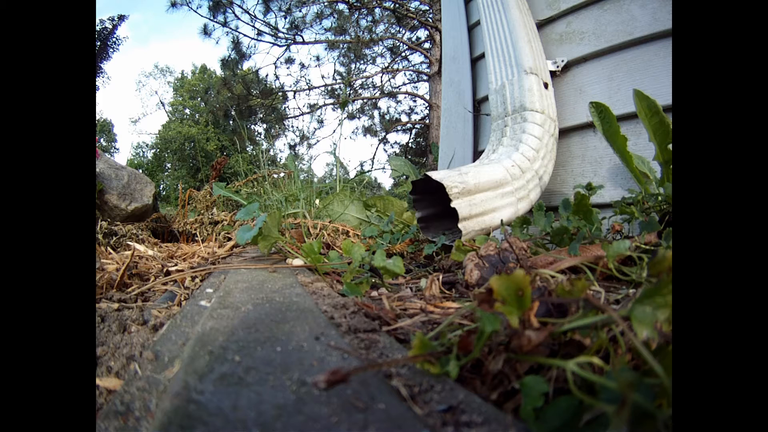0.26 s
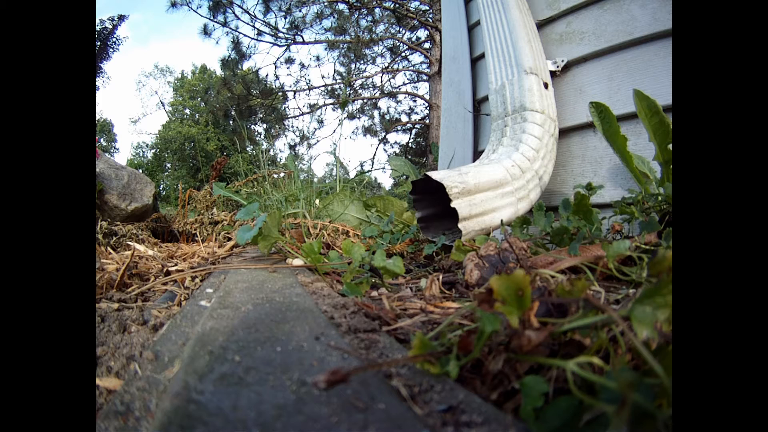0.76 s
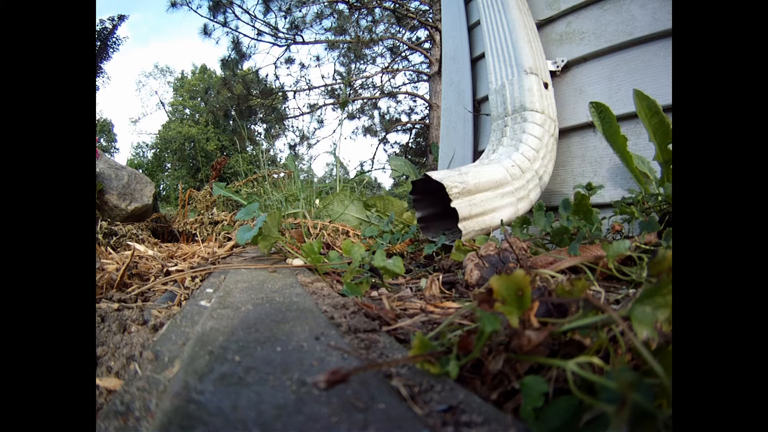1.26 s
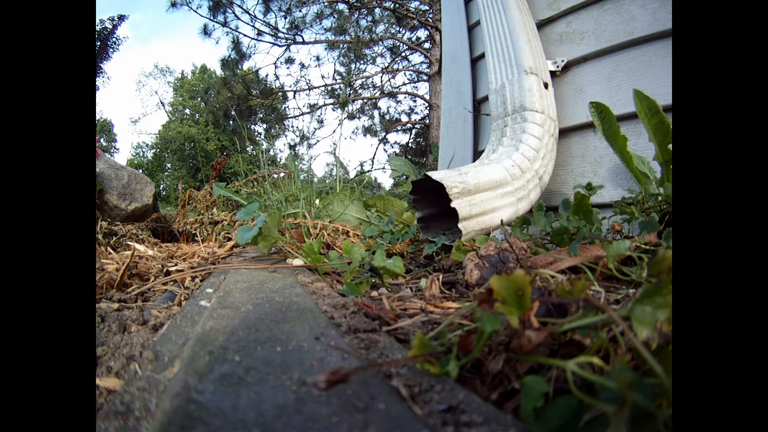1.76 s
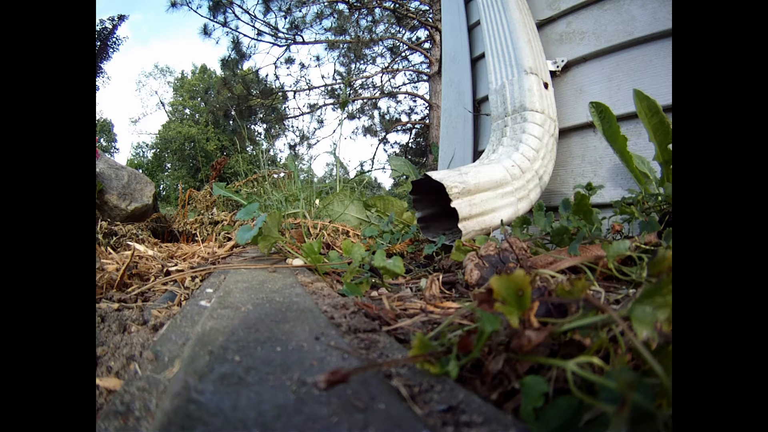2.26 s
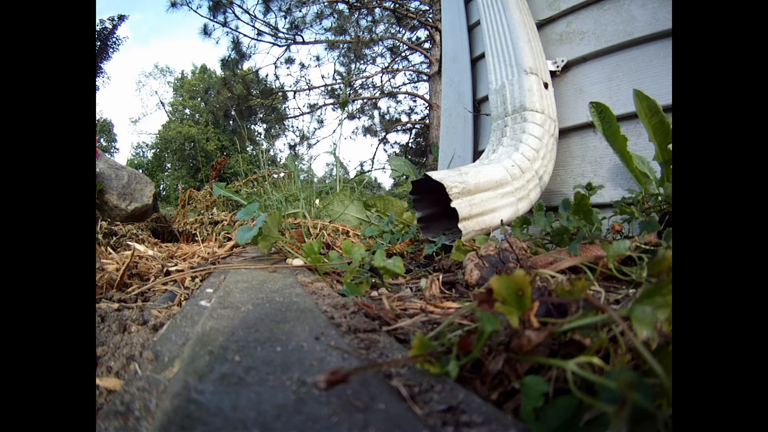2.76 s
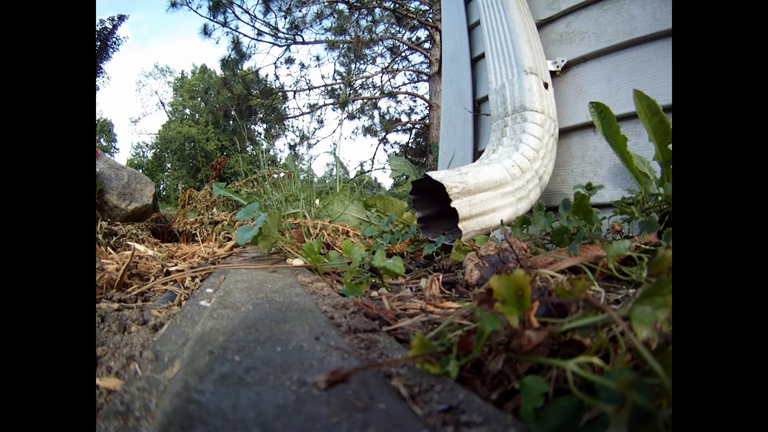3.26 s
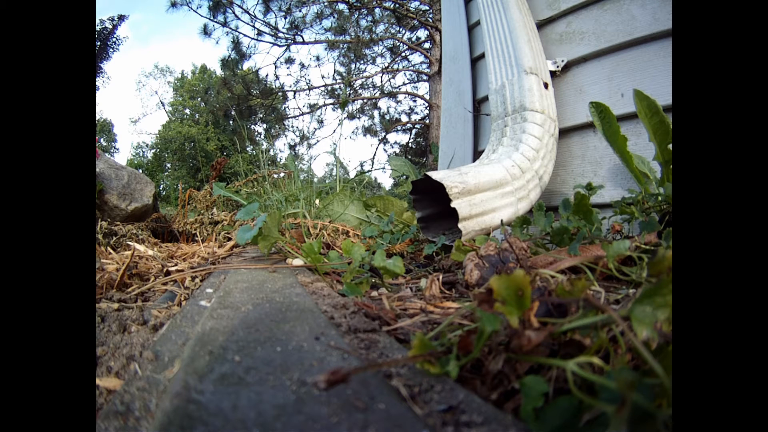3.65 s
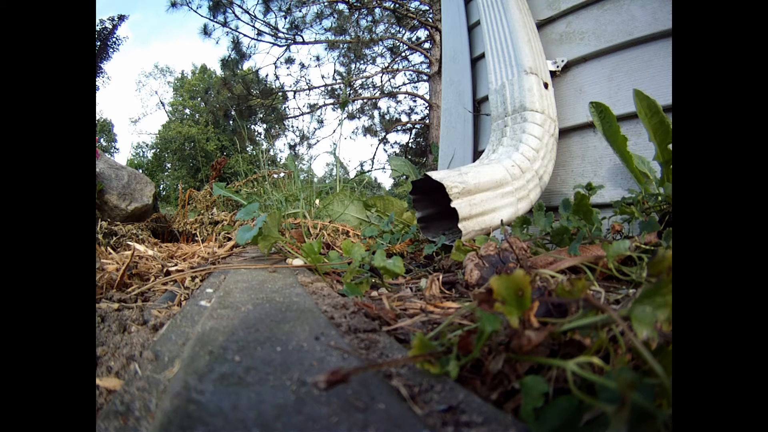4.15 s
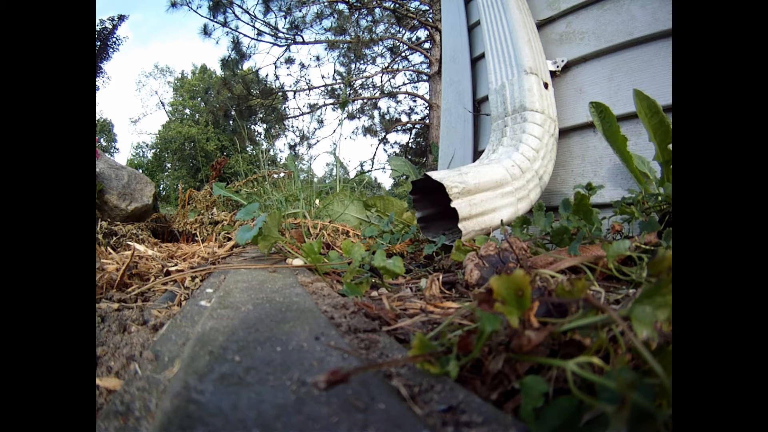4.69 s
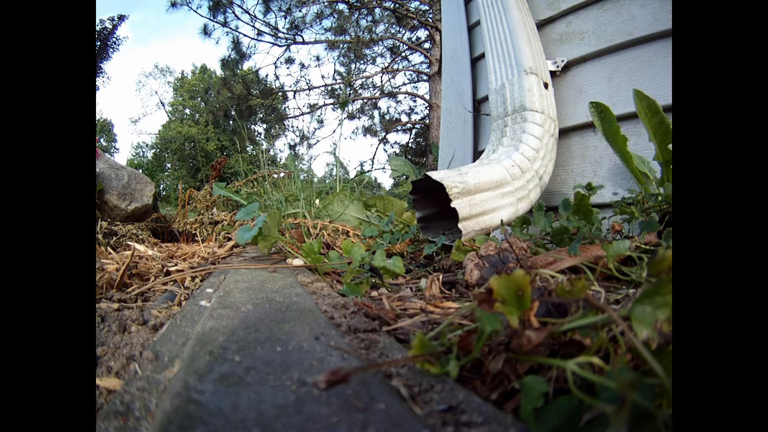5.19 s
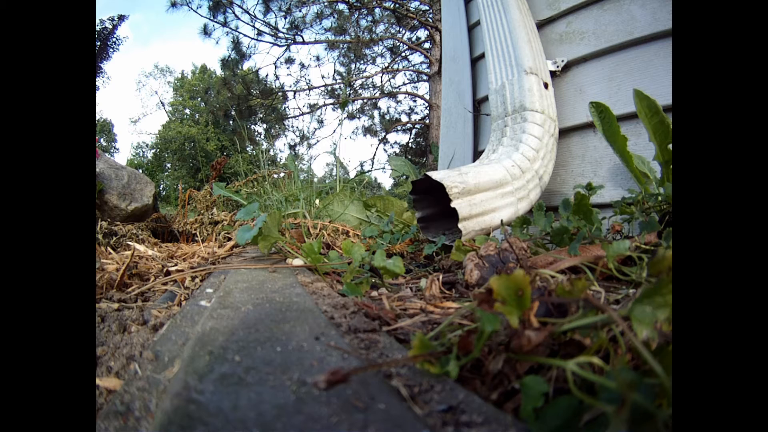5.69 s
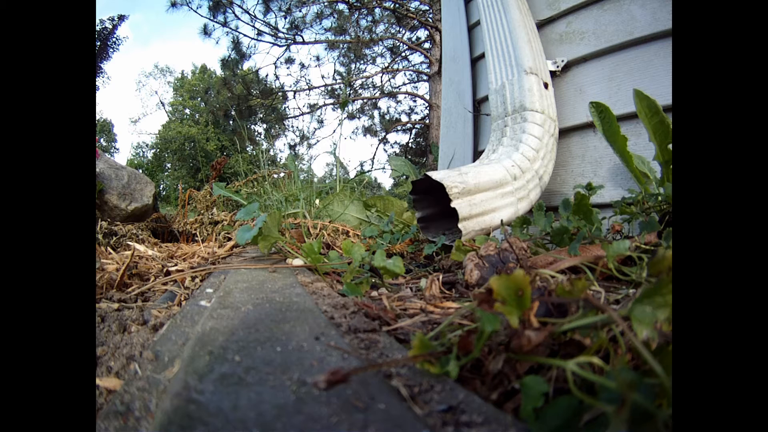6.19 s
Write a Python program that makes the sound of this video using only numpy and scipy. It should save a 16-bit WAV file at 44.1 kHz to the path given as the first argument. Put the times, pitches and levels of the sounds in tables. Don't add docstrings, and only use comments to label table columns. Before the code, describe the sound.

Claws scrabble faintly in a metal pipe, a piercing chip bursts out with a small rapid trill, then faint ticks over steady compressor hum.

```python
import sys
import numpy as np
from scipy import signal
from scipy.fft import rfft, irfft, next_fast_len
from scipy.io import wavfile
from scipy.ndimage import uniform_filter1d

SR = 44100
rng = np.random.default_rng(int(sys.argv[2]) if len(sys.argv) > 2 else 0)


def level_to_linear(level):
    exponent = np.asarray(level, float) / 20
    return 10 ** exponent


def dump(signal):
    limited = np.clip(np.atleast_2d(signal).T, -1, 1)
    pcm = np.round(limited * 32767).astype(np.int16)
    wavfile.write(sys.argv[1], SR, pcm)


N = 283563

# time_s, pitch_hz, level_db
CHIP_PATH = [
    (1.139, 7957, -34),
    (1.143, 7000, -15),
    (1.148, 6074, -8.5),
    (1.1538, 5050, -5.8),
    (1.1585, 4446, -9),
    (1.164, 3480, -19),
    (1.171, 2850, -26),
    (1.1755, 2830, -28),
    (1.179, 2650, -49),
]
# start_s, level_db, attack_s, hold_s, release_s
CHIP_BREATH = [
    (1.12, -33.5, 0.0029, .018, 0.0031),
    (1.142, -18.5, .008, 0.0067, .003),
    (1.154, -25, .004, .0005, .008),
]
# start_s, length_s, fall_hz, level_db, bend (above 1 holds the pitch first)
TRILL_NOTES = [
    (1.2075, .0115, 700, -29, .8),
    (1.2535, .0115, 800, -29, .9),
    (1.297, .014, 1000, -25.5, 1.5),
    (1.346, .016, 900, -24.5, 1.5),
    (1.393, .018, 1500, -26, 1.4),
    (1.443, .019, 1650, -27, 1.1),
    (1.492, .018, 1150, -28, 2.2),
    (1.541, .020, 1950, -29, 1.1),
]
# delay_s, level_db
PIPE_ECHOES = [(.0020, -10.5), (0.0123, -19), (0.0144, -20.5), (0.0192, -23), (.0285, -23), (0.031, -27.5)]
# pitch_hz, level_db, t60_s
PIPE_AIR = [(2830, -46.5, 0.12), (3310, -46.5, 0.092)]
# pitch_hz, level_db, t60_s
PIPE_LOW = [(947.5, -8, 0.074), (1160, -9, 0.011), (1387, -2.5, 0.027)]
# pitch_hz, level_db, t60_s
PIPE_WALL = [(2291, -0.5, 0.055), (1883, -9.5, 0.018)]
# pitch_hz, level_db, t60_s
PIPE_HIGH = [(3170, -25, 0.014), (3711, -7, 0.02), (4260, -9, 0.021), (4900, -3, .01), (5401, 6.5, 0.015)]
# start_s, peak_db
SCRAMBLE_TICKS = [(0.0044, -41), (0.0273, -47), (0.5067, -52.5), (0.7518, -54), (0.99, -45), (0.9969, -47),
                  (1.0893, -48.5), (1.114, -44), (1.2495, -36.5), (1.4376, -46.5), (1.4864, -44),
                  (1.5917, -55.5), (1.6793, -48), (1.7797, -60), (1.7998, -57.5), (1.908, -54),
                  (1.926, -56.5), (2.0262, -56), (2.0475, -56.5), (2.058, -47.5), (2.176, -60),
                  (2.257, -45.5), (2.267, -58), (2.2969, -45.5), (2.3037, -42.5), (2.3126, -43),
                  (2.3236, -51.5), (2.3581, -50), (2.5146, -56.5), (2.535, -44.5)]
# start_s, peak_db
CREEP_TICKS = [(2.7161, -55), (2.744, -52), (2.973, -58), (3.2138, -56.5), (3.3936, -60.5), (3.4916, -57),
               (3.503, -62.5), (3.528, -62), (3.688, -61.5), (3.8894, -63), (4.158, -64), (4.308, -54.5),
               (4.6435, -55.5), (5.2257, -56), (5.2622, -56), (5.9072, -57), (6.4078, -62.5)]
# start_s, wall_ring_db, low_knock_db
PAW_THUDS = [(0.168, -55, -53), (0.2778, -55, -56), (0.3347, -56.5, -49), (0.3584, -64, -59.5),
             (0.7391, -52, -60), (0.9671, -61.5, -50), (0.9794, -50.5, -52.5), (1.2495, -60, -38.5),
             (1.2595, -49.5, -43), (1.9788, -58, -65), (2.108, -43, -48), (2.12, -48, -51.5),
             (2.14, -50, -57), (2.257, -49.5, -41), (2.3236, -56.5, -49), (2.3335, -56, -54),
             (2.5141, -53, -69), (2.5192, -51.5, -57), (2.973, -54, -70)]
# start_s, level_db, attack_s, hold_s, release_s
SLIDES = [(0.001, -48.5, 0.0024, .04, .07), (0.14, -65, 0.058, 0.078, .2), (0.29, -64.5, 0.044, .02, 0.22),
          (.51, -62.5, .03, 0.014, 0.059), (.72, -66.5, .2, .08, .4), (1.002, -48.5, .06, .002, .045),
          (1.04, -55.5, 0.03, .002, 0.0704), (1.118, -47.5, 0.046, .002, .003),
          (1.19, -54.5, .003, .14, .7), (2.124, -60, .25, .1, .5), (2.53, -65.5, .04, .02, .06)]
# start_s, length_s, start_hz, end_hz, level_db
BIRD_NOTES = [
    (.862, .03, 3150, 3100, -65),
    (3.09, .18, 2900, 2050, -71),
    (3.595, .025, 4100, 4000, -71),
    (3.65, .3, 4800, 2550, -72),
    (3.89, .15, 2900, 1950, -67),
    (3.87, .025, 4100, 4000, -71),
    (4.1, .12, 2400, 2000, -73),
]
# start_s, level_db, attack_s, hold_s, release_s
BARK_SWELL = (6.19, -59.5, .045, .03, .15)
# multiple, level_db
BARK_PARTIALS = [(2, 4.5), (3, 9), (4, 1.5), (5, -12.5), (6, -6)]
# multiple, level_db
NEAR_LINES = [(1, -63.5), (2, -47.5), (3, -62), (4, -49.5), (5, -49.5), (6, -65), (7, -57), (8, -57),
              (10, -76), (11, -71.5)]
# multiple, level_db
FAR_LINES = [(1, -61.5), (2, -50.5), (3, -72.5), (4, -57)]
# time_s, level_db
HUM_SWELL = [(0.0, -53), (0.09, -49), (1.11, -48.5), (1.22, -58.5), (1.32, -46), (3.28, -45.5), (3.33, -44),
             (4.32, -50), (5.32, -43), (5.46, -54), (5.53, -42), (5.71, -50.5), (5.77, -46), (6.23, -55.5),
             (6.32, -45.5), (6.43, -56)]
# frequency_hz, level_db_per_hz
FLOOR_COLOUR = [(15, -94), (35, -74.5), (60, -64.5), (110, -71.5), (170, -75), (240, -81), (320, -87),
                (600, -95), (1200, -96.5), (2400, -100), (4000, -103), (5500, -103), (5900, -108),
                (9000, -110)]
# frequency_hz, gain_db
MIC_RESPONSE = [(2000, 0), (5000, 0.5), (5330, 0), (5450, -7.5), (5600, -3.5), (5850, -9), (7000, -14.5),
                (9000, -6.5)]


def rms_one(x):
    return x / np.sqrt(np.mean(x ** 2) + 1e-20)


def in_time(rows):
    t = np.arange(N) / SR
    s, *columns = np.transpose(rows)
    return [np.interp(t, s, c) for c in columns], (t > s[0]) & (t < s[-1])


def swell(rows):
    out = 0
    for s, db, attack, hold, release in rows:
        corners = s + np.cumsum([-attack, attack, hold, release])
        (shape,), on = in_time(np.transpose([corners, [-25, 0, 0, -25]]))
        out = out + on * level_to_linear(db + shape)
    return out


def shaped(x, gain):
    size = next_fast_len(N)
    hz = np.fft.rfftfreq(size, 1 / SR) + 0.00082
    return irfft(rfft(x, size) * gain(hz), size)[:N]


def colour(x, points):
    hz, db = np.transpose(points)
    return shaped(x, lambda f: level_to_linear(np.interp(np.log(f), np.log(hz), db)))


def drift(rate):
    r = np.exp(-80 * np.pi * rate / SR)
    slow = signal.lfilter([1], [1, -2 * r, r * r], rng.standard_normal(N // 40 + 2002))[2000:]
    return np.interp(np.arange(N) / 40, np.arange(len(slow)), rms_one(slow))


def ring(clicks, modes):
    out = 0
    for hz, db, t60 in modes:
        r, w = level_to_linear(-60 / (t60 * SR)), 2 * np.pi * hz / SR
        out = out + level_to_linear(db) * signal.lfilter([0, np.sin(w)], [1, -2 * r * np.cos(w), r * r], clicks + 1e-18)
    return out


def whistles(notes, edge):
    out = np.zeros(N)
    for s, length, start_hz, end_hz, db, bend in notes:
        u = np.linspace(0, 1, int(length * SR))
        phase = 2 * np.pi * np.cumsum(start_hz + (end_hz - start_hz) * u ** bend) / SR
        fade = np.clip(np.minimum(u, .5 * (1 - u)) / edge, 0, 1)
        out[int(s * SR):][:len(u)] += level_to_linear(db) * np.sin(phase) * fade
    return out


def dying_noise(t60, size):
    fade = level_to_linear(-60 * np.arange(size) / SR / t60)
    return rms_one(rng.standard_normal(size) * fade) / np.sqrt(size)


def chipmunk():
    (hz, db), on = in_time(CHIP_PATH)
    throb_s, throb_per_s, throb_db = 1.148, 190, 8.5
    beats = np.clip((np.arange(N) / SR - throb_s) * throb_per_s, 0, 3)
    loudness = np.sqrt(2) * level_to_linear(db - throb_db * np.sin(np.pi * beats) ** 2) * on
    phase = 2 * np.pi * np.cumsum(hz * on) / SR
    chip = loudness * (np.sin(phase) + level_to_linear(-18.5) * np.sin(2 * phase))

    breath = colour(rng.standard_normal(N),
                    [(300, -21.0), (600, -18.5), (850, 8.5), (1200, -13), (3000, -0.5), (4500, -1)])
    rasp = swell(CHIP_BREATH) * breath

    middle_hz = 4225
    trill = [(s, length, middle_hz + fall / 2, middle_hz - fall / 2, db, bend)
             for s, length, fall, db, bend in TRILL_NOTES]
    return pipe_and_yard(chip + whistles(trill, edge=.17)) + rasp


def pipe_and_yard(x):
    response = np.zeros(16000)
    response[0] = 1
    for delay, db in PIPE_ECHOES:
        response[round(delay * SR)] = level_to_linear(db)
    response[200:] += level_to_linear(-15) * dying_noise(t60=0.25, size=15800)
    return signal.fftconvolve(x, response)[:N] + ring(x, PIPE_AIR)


def contacts():
    tips = []
    for s, db in [*SCRAMBLE_TICKS, *CREEP_TICKS]:
        body_db = -5.5 - 0.66 * (db + 55)
        tips.append((s, db, body_db, body_db, 0.012))
    tick_db = -9
    paws = [(s, wall + tick_db, -tick_db, low - wall - tick_db, .011) for s, wall, low in PAW_THUDS]
    return tips + paws


def claws():
    high, wall, low = np.zeros((3, N))
    grain_size = level_to_linear(3.23 * np.minimum(rng.exponential(1, N), 4))
    grains = (rng.random(N) < 3000 / SR) * grain_size * rng.choice([-1, 1], N)
    for s, db, wall_db, low_db, length in contacts():
        at = int(s * SR)
        length = max(length, .001)
        u = np.arange(min(int(4 * length * SR), N - at)) / SR
        run = grains[at:at + len(u)] * np.exp(-u / length)
        run[0] = 6
        high[at:at + len(u)] += level_to_linear(db - 15) * run
        wall[at:at + len(u)] += level_to_linear(db + wall_db - 18.5) * run
        low[at:at + len(u)] += level_to_linear(db + low_db - 19.5) * run
    crackle = level_to_linear(11.0) * np.diff(high, prepend=0)
    thud = level_to_linear(7.0) * signal.lfilter([.3, 0, -.3], [1, -1.55, .58], wall + low)
    out = crackle + thud
    for clicks, modes in ((high, PIPE_HIGH), (wall, PIPE_WALL), (low, PIPE_LOW)):
        for mode in modes:
            out += ring(clicks * level_to_linear(1.1 * drift(25)), [mode])
    return out


def rustle():
    grain_size = level_to_linear(2.5 * rng.exponential(1, (2, N)))
    grains = (rng.random((2, N)) < 6000 / SR) * grain_size * rng.choice([-1, 1], (2, N))
    bright_band = signal.butter(2, [1800, 7000], "band", fs=SR, output="sos")
    dull_band = signal.butter(2, [500, 2200], "band", fs=SR, output="sos")
    bright = rms_one(signal.sosfilt(bright_band, grains[0]))
    dull = rms_one(signal.sosfilt(dull_band, grains[1]))
    return swell(SLIDES) * (bright + level_to_linear(-7) * dull) * level_to_linear(2 + 2.5 * drift(30))


def dog():
    bark_hz, flat_hz, settle_s = 424, 20, .02
    late = np.maximum(np.arange(N) / SR - BARK_SWELL[0], 0)
    hz = bark_hz - flat_hz * np.exp(-late / settle_s)
    phase = 2 * np.pi * np.cumsum(hz * (1 + .028 * drift(60))) / SR
    hoarse = 1 + .4 * drift(250)
    voice = sum(level_to_linear(db + 5.3 * drift(25)) * np.sin(k * phase) for k, db in BARK_PARTIALS)
    return swell([BARK_SWELL]) * hoarse * voice


def birds():
    song_s, gap_s = 4.31, .313
    song_note = (.125, 4600, 2950, -71.5, .5)   # length_s, start_hz, end_hz, level_db, bend
    notes = [(*row, .8) for row in BIRD_NOTES]
    notes += [(song_s + gap_s * k, *song_note) for k in range(6)]
    return whistles(notes, edge=.2) * level_to_linear(3 * drift(90))


def far_calls():
    bird, bark = birds(), dog()
    blur = dying_noise(t60=.55, size=14000)
    birds_heard = level_to_linear(-13) * bird + level_to_linear(6.5) * signal.fftconvolve(bird, blur)[:N]
    return birds_heard + bark + level_to_linear(-5) * signal.fftconvolve(bark, blur)[:N]


def compressor(shaft_hz, orders, wander, sway_db):
    (deep_db,), _ = in_time(HUM_SWELL)
    upper_db = 0.097 * deep_db - .5 * np.arange(N) / SR
    turn = 2 * np.pi * np.cumsum(shaft_hz * (1 + wander * drift(0.83))) / SR
    out = 0
    for k, db in orders:
        swell_db = deep_db if k * shaft_hz < 70 else upper_db
        gain = level_to_linear(db + swell_db - swell_db.mean() + sway_db * drift(1.2))
        out = out + np.sqrt(2) * gain * np.sin(k * turn + rng.uniform(0, 2 * np.pi))
    return out


def background_hiss():
    return colour(rng.standard_normal(N) * np.sqrt(SR / 2), FLOOR_COLOUR) * level_to_linear(.5 * drift(3))


def scene():
    near = compressor(25.67, NEAR_LINES, wander=.002, sway_db=1.82)
    far = compressor(55.6, FAR_LINES, wander=.012, sway_db=2.0)
    mono = chipmunk() + claws() + rustle() + far_calls() + near + far + background_hiss()
    return np.array([mono, mono])


def stereo_grain(x, db, power, empty_db):
    z = signal.stft(x, nperseg=2048)[2]
    level = np.exp(uniform_filter1d(np.log(np.abs(z) + 1e-9), size=13, axis=0))
    half_rate = slice(264, 294)
    kept = uniform_filter1d(np.abs(z[half_rate]).mean(axis=0), size=3) > level_to_linear(empty_db)
    z[half_rate] *= kept
    level[half_rate] *= kept

    frames = z.shape[1]
    runs = rms_one(uniform_filter1d(rng.standard_normal(frames), size=4))
    patches = rms_one(uniform_filter1d(rng.standard_normal((82, frames)), size=3))
    patches = np.repeat(patches, 13, axis=0)[:1025]
    loud = level[40:].mean(axis=0) > level_to_linear(-74)
    apart = (patches > -1.2) * np.where(loud, level_to_linear(7), 1)
    apart[:17] = (runs > 1.8) * level_to_linear(3) + loud * level_to_linear(13)

    noise = signal.stft(rng.standard_normal((2, N)), nperseg=2048)[2]
    grain = level_to_linear(db) * noise / np.abs(noise).mean() * level ** power * apart
    return signal.istft(z + grain, nperseg=2048)[1][:, :N]


def roll_off(x):
    return signal.sosfilt(signal.butter(12, 10460, fs=SR, output="sos"), x)


def record(dry):
    sample_hz = 12000
    mirror = 1 + 2 * np.cos(2 * np.pi * sample_hz * np.arange(N) / SR)
    sampled = colour(dry[0], MIC_RESPONSE) * mirror
    held = shaped(sampled, lambda hz: np.sinc(hz / sample_hz) * (hz < 10500))
    mix = stereo_grain(held, db=-31, power=0.78, empty_db=-103.5)
    return roll_off(mix)


dry = scene()
out = record(dry)
dump(out)
```